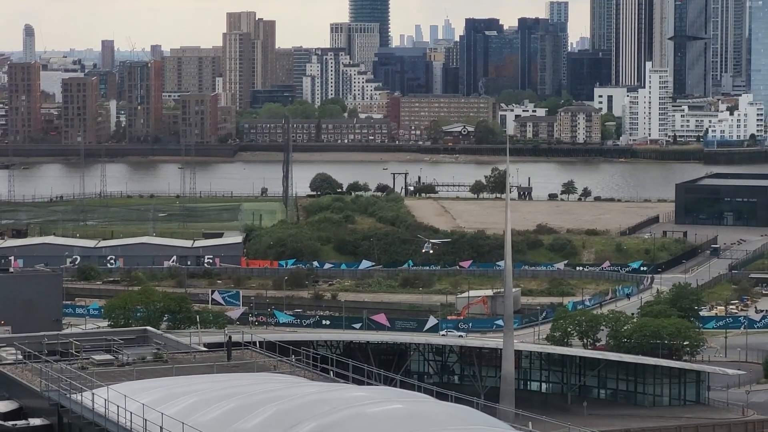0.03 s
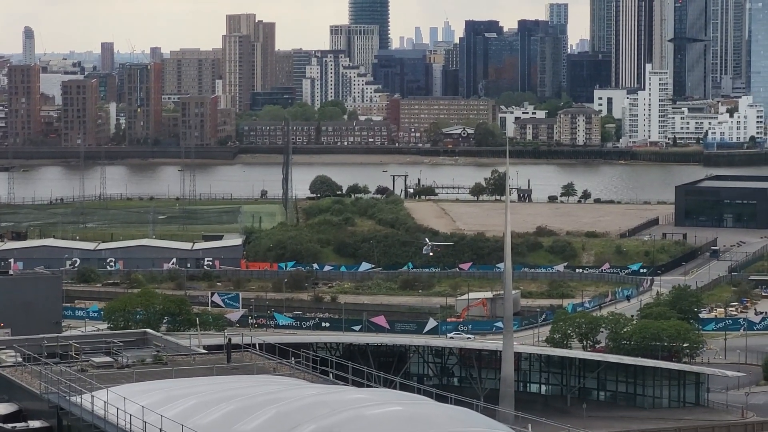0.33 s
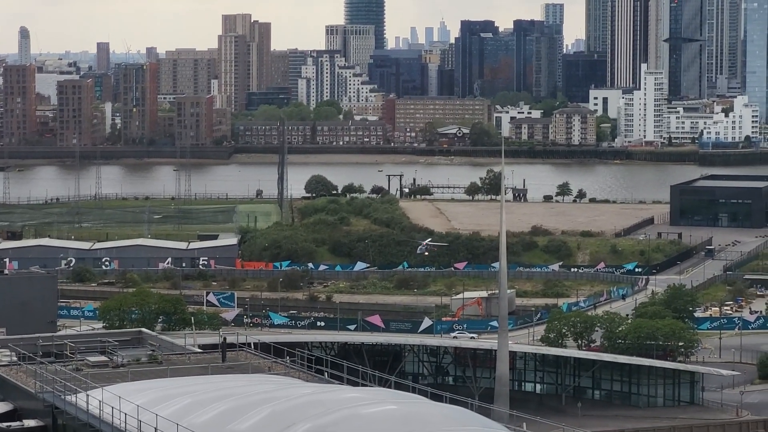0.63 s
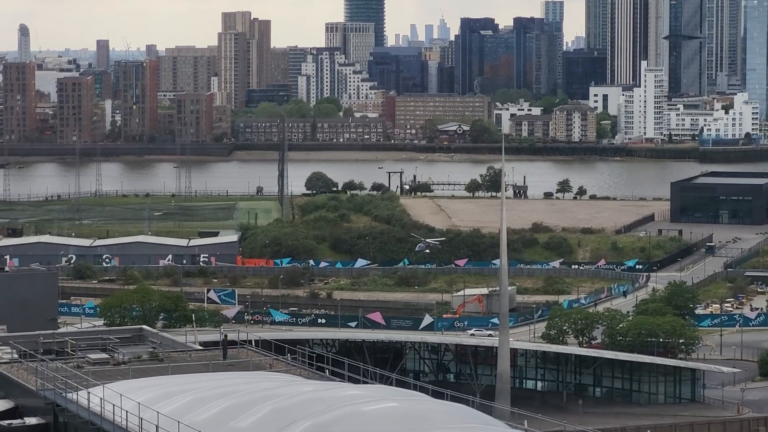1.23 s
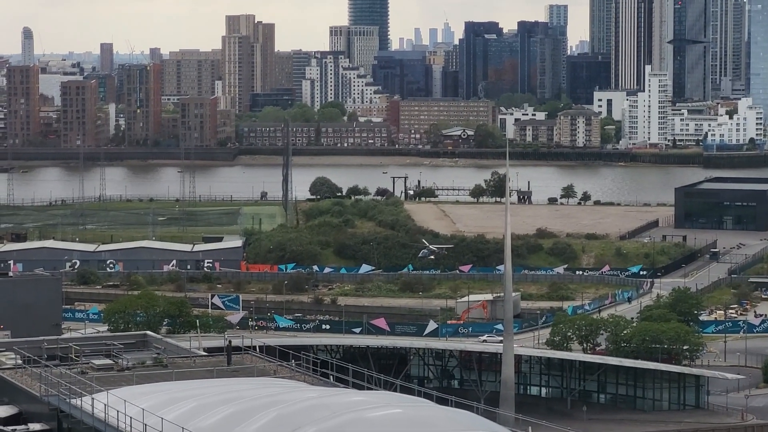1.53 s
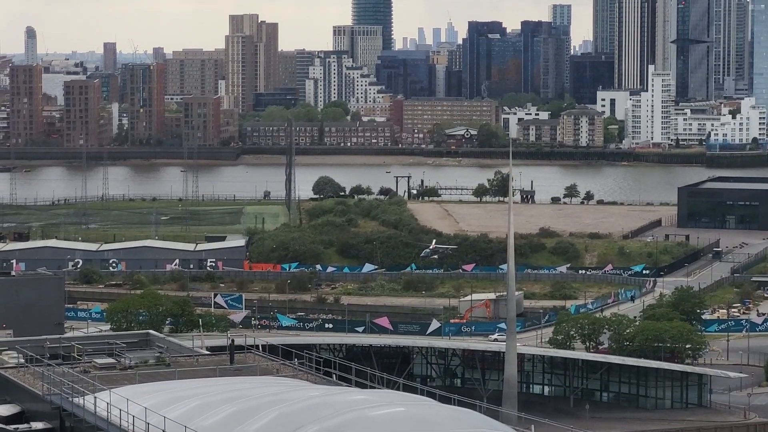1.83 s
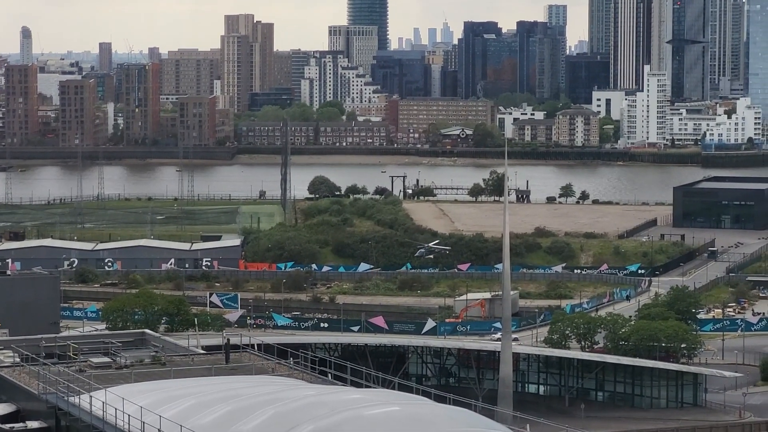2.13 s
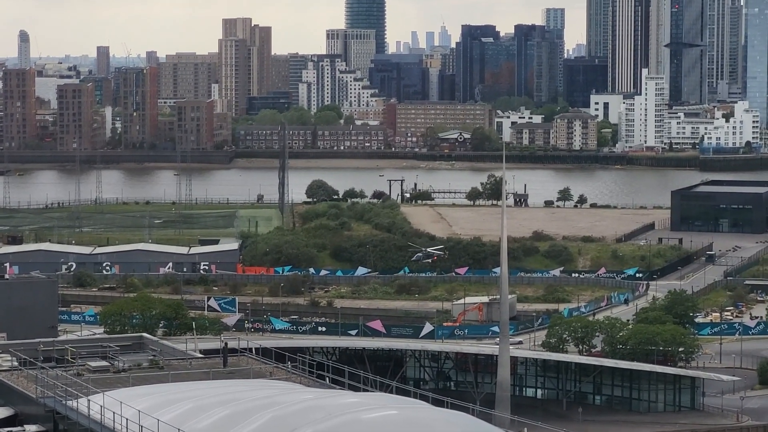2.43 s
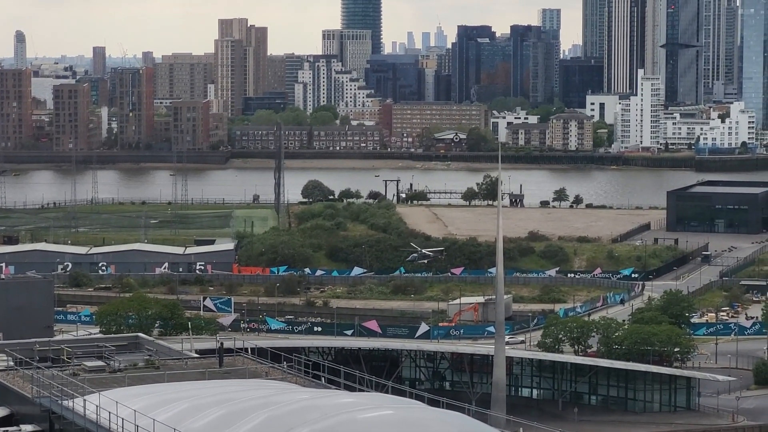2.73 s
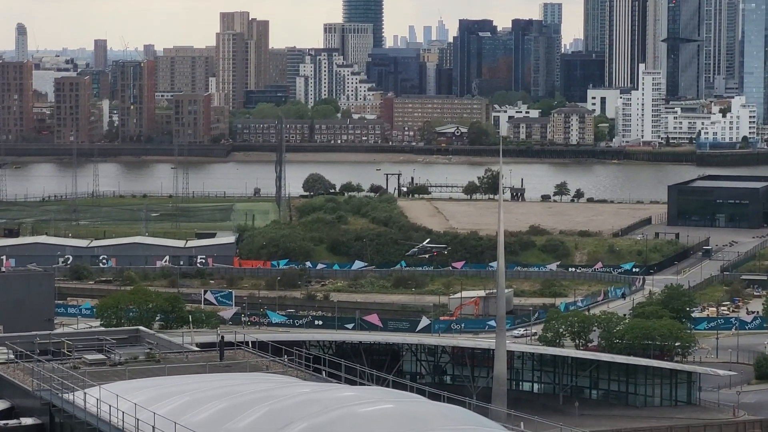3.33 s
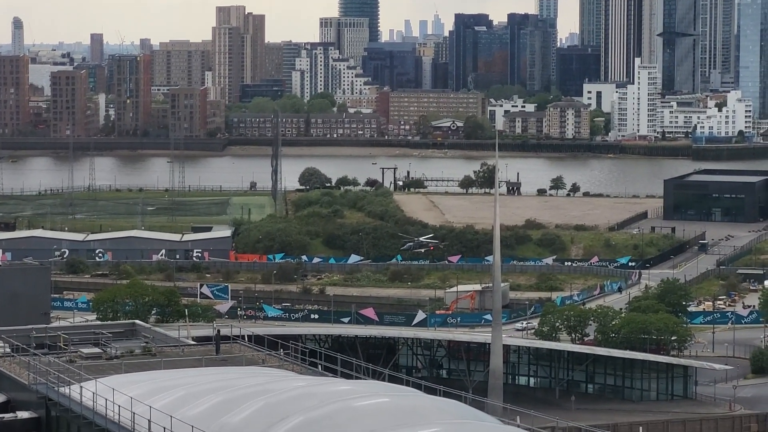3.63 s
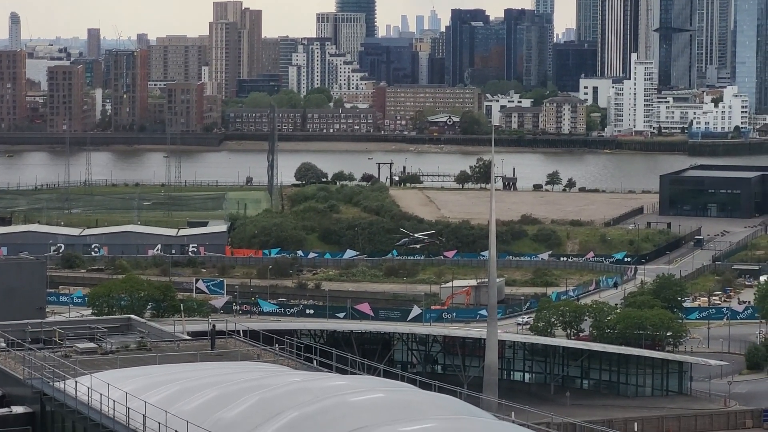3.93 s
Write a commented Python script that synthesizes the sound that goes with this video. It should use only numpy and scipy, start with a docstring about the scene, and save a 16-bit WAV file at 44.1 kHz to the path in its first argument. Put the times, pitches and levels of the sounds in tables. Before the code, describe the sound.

Heard from a high city rooftop on a stereo microphone, a far-off propeller plane gives a wavering drone and a rush of air, growing a little louder midway, while low traffic rumble and machine hum continue underneath.

```python
"""Distant propeller aircraft over a city

From a high roof, on a stereo microphone: the aircraft drones far off, its blade tones swelling and fading in
turn, over a rush of wake and exhaust that brightens as it passes. Traffic rumbles and machines hum below; a few
very faint, thin whistles sound at the start and end."""
import sys
import numpy as np
from scipy import signal
from scipy.io import wavfile
from scipy.ndimage import uniform_filter1d

SR = 44100
rng = np.random.default_rng(int(sys.argv[2]) if len(sys.argv) > 2 else 0)


def master_out(mix):
    """Clip the mix to full scale and print it as 16-bit PCM to the path in sys.argv[1]."""
    frames = np.transpose(np.atleast_2d(mix))
    ceiling = np.clip(frames, -1, 1)
    pcm = np.round(ceiling * 32767).astype(np.int16)
    wavfile.write(sys.argv[1], SR, pcm)


N = 176400
TIME = np.arange(N) / SR

# The first propeller's pitch. Each row: time in seconds, blade-pass rate in Hz.
BLADE_PASS = [(0, 70.5), (.7, 70.9), (1.5, 70.8), (2.2, 71.0), (2.8, 71.2), (4, 71.1)]
# Its three lowest tones as they reach the roof. Each row: time in seconds, level in dB.
FIRST_TONE = [(0, -60.5), (1.25, -57), (1.55, -52), (2.3, -47.5), (2.7, -42.5), (3.6, -46.5), (4, -43)]
SECOND_TONE = [(0, -44.5), (.12, -45.5), (.48, -50), (.85, -43.5), (1.25, -50.5), (1.5, -45), (2.351, -49),
               (2.801, -52), (3.252, -56.5), (3.45, -48), (3.6, -56.5), (4, -48.5)]
THIRD_TONE = [(0, -45), (.3, -43), (.62, -49.5), (.94, -39), (1.04, -49.5), (1.2, -43.5), (1.29, -55),
              (1.35, -42), (1.68, -36.5), (1.82, -40.5), (2.15, -32.5), (2.4, -37.5), (2.49, -43),
              (3.15, -41.5), (3.27, -46.5), (3.72, -56), (3.92, -44), (4, -46.5)]
# Each propeller's higher tones. Each row: multiple of its blade rate, dB added to OVERTONE_SWELL.
FIRST_PROP_OVERTONES = [(4, -4.5), (5, -2), (6, -0.5), (7, -7), (8, -1), (9, -4.5), (10, -5.5), (11, -9),
                        (12, -13), (13, -14.5), (14, -10.5)]
SECOND_PROP_OVERTONES = [(8, -8), (9, -1), (11, -8), (12, -14.5), (13, -10.5), (14, -8.5), (16, -8.5)]
# Their swell and fade. Each row: time in seconds, then level in dB in the low, middle and high band.
OVERTONE_SWELL = [(0, -56.5, -70, -62), (.55, -52.5, -52.5, -58), (.78, -41, -51.5, -55.5),
                  (.98, -42.5, -45.5, -57), (1.25, -51, -56.5, -63.5), (1.85, -52.5, -53.5, -56.5),
                  (2.15, -46, -51, -57), (2.33, -45.5, -46.5, -49), (2.52, -50, -47.5, -47.5),
                  (2.66, -39.5, -43, -48.5), (2.85, -55.5, -51, -52.5), (3.25, -55, -55.5, -54),
                  (4, -55, -53.5, -54.5)]
# The two borders between those bands, in Hz.
OVERTONE_BORDERS_HZ = [390, 535]
# The rush as the aircraft passes. Each row: time in seconds, then level in dB in each of four bands.
RUSH_SWELL = [(0, -44, -56, -59, -57), (.5, -45, -52.5, -57, -60.5), (.95, -45.5, -49, -53.5, -56.5),
              (1.32, -49.5, -53.5, -61, -59), (1.9, -48.5, -51, -53, -57), (2.25, -47.5, -48, -55, -53),
              (2.52, -48.5, -42.5, -52, -48.5), (2.66, -43.5, -50, -53, -50.5),
              (2.85, -48.5, -48.5, -50.5, -52), (3.4, -48.5, -47, -54.5, -53), (4, -55.5, -50, -58, -56)]
# The centres of those bands, in Hz.
RUSH_CENTRES_HZ = [331, 563, 843, 2100]
# Colour of the rush. Each row: frequency in Hz, dB added to RUSH_SWELL.
RUSH_COLOUR = [(20, -65.5), (105, -43), (160, -30), (200, -31), (260, -23), (310, -22), (380, -22.5),
               (470, -31), (540, -25), (650, -23), (750, -29.5), (1000, -25), (1300, -24), (1650, -30.5),
               (2000, -34.5), (2400, -41), (2900, -50), (3600, -52), (4500, -59.5), (6000, -69.5),
               (16000, -100)]
# Traffic below the roof, and microphone hiss. Each row: frequency in Hz, level in dB per Hz.
CITY_SPECTRUM = [(10, -110), (21, -89), (27, -64.5), (34, -67), (50, -70), (90, -77), (120, -74.5),
                 (155, -66.5), (200, -76.5), (500, -80), (1500, -87.5), (3000, -116), (6000, -125),
                 (7500, -125), (10000, -123), (13000, -121), (16000, -121)]
# Machines in the city. Each row: pitch in Hz, level in dB.
MACHINE_HUMS = [(35.5, -61.5), (64, -68.5), (78, -60)]
# Whistles. Each row: start and length in seconds, first, middle and last pitch in Hz, level in dB.
WHISTLE_GLIDES = [(.02, .11, 12000, 12450, 11900, -81), (.055, .085, 9650, 9650, 9200, -86),
                  (3.45, .09, 11700, 12100, 12550, -87), (3.49, .15, 9050, 10450, 11100, -84),
                  (3.62, .22, 10950, 10350, 8950, -85), (3.56, .4, 12300, 12350, 12250, -87),
                  (3.76, .2, 12900, 11900, 11600, -87), (3.82, .14, 10550, 10350, 10300, -88)]
# Fizz around the last whistles. Each row: time in seconds, level in dB.
FIZZ_SWELL = [(0, -110), (3.35, -105), (3.6, -76.5), (3.75, -79.5), (4, -82)]
# Colour of the fizz. Each row: frequency in Hz, relative level in dB.
FIZZ_COLOUR = [(20, -66), (4500, -23), (6800, 2.5), (9000, -3.5), (12500, 0.5), (16000, -7.5)]
# How alike the two microphone ports sound. Each row: frequency in Hz, likeness (clipped to 0..1 in use).
MIC_LIKENESS = [(30, 3.8), (200, 1.5), (290, 0.44), (370, 0.65), (460, 0.49), (540, -0.15), (630, 1.55),
                (820, 0.09), (1150, 0.71), (1450, 0.48), (2000, 0.17), (4000, 0.05), (9000, -3.4)]
# Phase between the ports. Each row: frequency in Hz, lead of the left in radians.
MIC_LEAD = [(20, -2.5), (70, 0.75), (130, 0.52), (220, 0), (340, 0.33), (440, -0.3), (600, 1.32),
            (780, 1.97), (1030, 2.5), (1290, 3.5), (1720, 5), (1980, 7), (2760, 5), (3500, 11)]
# Balance between the ports. Each row: frequency in Hz, left minus right in dB.
MIC_BALANCE = [(60, 0), (200, 0), (260, 2), (350, -0.5), (445, -5), (540, 2.5), (650, 0.5), (790, -0.5),
               (960, -1), (1180, -2.5), (1450, -1), (1800, 1.5), (2200, 7.5), (2700, 7.5), (3600, 6),
               (5000, 0), (8000, -1.6), (14000, -2)]


def propeller(turns, scatter=0.24, scatter_hz=11, right_scatter_hz=4):
    """The drone: the three lowest harmonics of the passing blades, wavering in moving air."""
    out, rate = np.zeros((2, N)), np.mean(at_time(BLADE_PASS, TIME))
    for k, curve in enumerate((FIRST_TONE, SECOND_TONE, THIRD_TONE), 1):
        tone = amp(at_time(curve, TIME)) * np.exp(2j * np.pi * (k * turns + rng.random()))
        wavering = tone * (1 + scatter * drift(scatter_hz))
        out += microphone(wavering, tone * drift(right_scatter_hz), k * rate).real
    return np.sqrt(2) * out


def blade_overtones(turns, table, scatter=0.45, fade_hz=5):
    """One propeller's higher tones, scattered by turbulent air on the long way to the roof."""
    out, rate = np.zeros((2, N)), turns[-1] / TIME[-1]
    for k, db in table:
        band = np.searchsorted(OVERTONE_BORDERS_HZ, k * rate)
        level = at_time(OVERTONE_SWELL, TIME, column=1 + band)
        tone = amp(level + db) * np.exp(2j * np.pi * (k * turns + rng.random()))
        scattered = tone * unit(1 + scatter * drift(fade_hz))
        out += microphone(scattered, tone * drift(fade_hz), k * rate).real
    return np.sqrt(2) * out


def rush(turns, throb=0.097):
    """Blade wake and exhaust noise from far off, throbbing slightly at the blade rate."""
    air = noise(lambda t, hz: at_hz(RUSH_COLOUR, hz) + rush_level(t, hz), patchy_db=1.7)
    return air * (1 + throb * np.cos(2 * np.pi * turns))


def rush_level(t, hz):
    """Swell of the rush in dB at any frequency, blended from its four bands."""
    bands = np.eye(len(RUSH_CENTRES_HZ))
    shares = [np.interp(np.log(hz + 1), np.log(RUSH_CENTRES_HZ), band) for band in bands]
    return sum(share * at_time(RUSH_SWELL, t, column=k) for k, share in enumerate(shares, 1))


def city(waver=0.3):
    """Traffic rumble and wavering machine hums from below, with a low microphone hiss."""
    out = noise(lambda t, hz: at_hz(CITY_SPECTRUM, hz), patchy_db=1.0, size=4096)
    for hz, db in MACHINE_HUMS:
        hum = np.sqrt(2) * amp(db) * np.exp(2j * np.pi * (hz * TIME + rng.random()))
        out += microphone(hum * (1 + waver * drift(5.1)), hum * drift(2), hz).real
    return out


def whistles(rough=0.86, waver_hz=55):
    """Thin, gliding whistles that barely reach the microphone, the last ones in a faint fizz."""
    fizz = noise(lambda t, hz: at_hz(FIZZ_COLOUR, hz), patchy_db=3.5)
    out = unit(fizz) * amp(at_time(FIZZ_SWELL, TIME))
    for start, length, first_hz, middle_hz, last_hz, db in WHISTLE_GLIDES:
        progress = np.clip((TIME - start) / length, 0, 1)
        glide = np.polyfit([0, .5, 1], [first_hz, middle_hz, last_hz], 2)
        hz = np.polyval(glide, progress) + waver_hz * drift(30).real
        envelope = amp(db) * np.sqrt(abs(np.sin(np.pi * progress)))
        tone = envelope * np.exp(2j * np.pi * np.cumsum(hz) / SR)
        out += np.array([(tone * unit(1 + rough * drift(50))).real for side in range(2)])
    return out


def microphone(common, unrelated, hz):
    """Left and right port: both hear one complex signal, the right mixed with an unrelated one."""
    likeness = np.clip(at_hz(MIC_LIKENESS, hz), 0, 1)
    tilt = amp(at_hz(MIC_BALANCE, hz))
    lag = np.exp(-1j * at_hz(MIC_LEAD, hz))
    right = (likeness * common + np.sqrt(1 - likeness ** 2) * unrelated) * lag
    return np.array([common * tilt, right]) * np.sqrt(2 / (1 + tilt ** 2))


def noise(field_db, patchy_db, size=2048):
    """Noise at the microphone, shaped over time and frequency, with random louder and softer patches."""
    hop = size // 4
    t, hz = np.arange(N // hop + 3)[:, None] * hop / SR, np.fft.rfftfreq(size, 1 / SR)
    a, b, c, d, patches = rng.standard_normal((5, len(t), len(hz)))
    patches = unit(uniform_filter1d(uniform_filter1d(patches, size=9, axis=0), size=14, axis=1))
    spectra = microphone(a + 1j * b, c + 1j * d, hz) * amp(field_db(t, hz) + patchy_db * patches)
    _, sound = signal.istft(spectra.transpose(0, 2, 1), nperseg=size, noverlap=size - hop)
    return sound[:, :N] * np.sqrt(SR / size)


def drift(rate_hz, count=2048):
    """A slow, random complex wander of rms about 1."""
    step_s = 4 * N / SR / count
    hz = np.fft.fftfreq(count, step_s)
    spectrum = rng.standard_normal((count, 2)) @ [1, 1j]
    slow = unit(np.fft.ifft(spectrum * np.exp(-.5 * (hz / rate_hz) ** 2)))
    return np.interp(TIME, np.arange(count) * step_s, slow)


def amp(db):
    """Decibels to gain."""
    return 10 ** (np.asarray(db) / 20)


def unit(x):
    """Scales to rms 1."""
    return x / np.sqrt(np.mean(abs(x) ** 2) + 1e-30)


def at_hz(points, hz):
    """Reads a spectrum on a log-frequency axis."""
    f, value = np.transpose(points)
    return np.interp(np.log(hz + 1), np.log(f + 1), value)


def at_time(points, t, column=1):
    """Reads one column of a curve over time."""
    rows = np.array(points)
    return np.interp(t, rows[:, 0], rows[:, column])


def scene(second_faster_hz=1.2):
    """From the roof: two propellers far off, one turning a little faster, and the city below."""
    turns = np.cumsum(at_time(BLADE_PASS, TIME)) / SR  # one turn of phase per blade pass
    buzz = blade_overtones(turns, FIRST_PROP_OVERTONES)
    buzz += blade_overtones(turns + second_faster_hz * TIME, SECOND_PROP_OVERTONES)
    return propeller(turns) + buzz + rush(turns) + city() + whistles()


def record(dry, fade_s=.004, edge_hz=15750):
    """Soft ends and the recorder's band limit."""
    ends = np.minimum(np.minimum(TIME, TIME[::-1]) / fade_s, 1)
    lowpass = signal.firwin(1023, edge_hz, window=("kaiser", 9), fs=SR)
    return signal.oaconvolve(dry * ends, lowpass[None], "same")


dry = scene()
out = record(dry)
master_out(out)
```